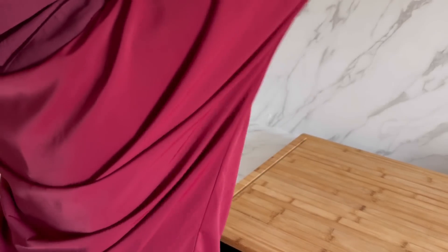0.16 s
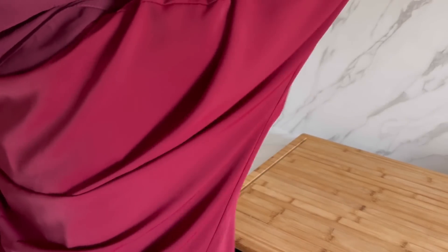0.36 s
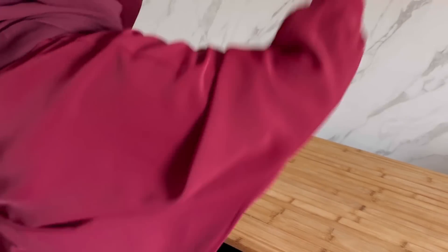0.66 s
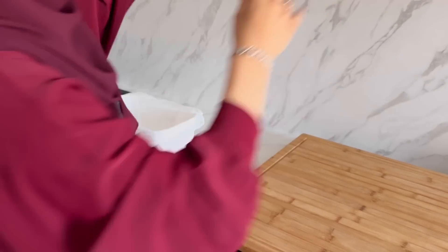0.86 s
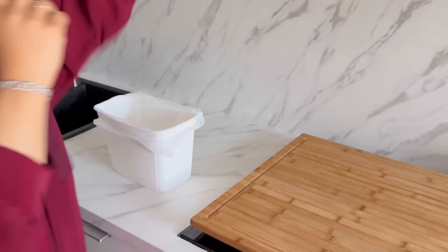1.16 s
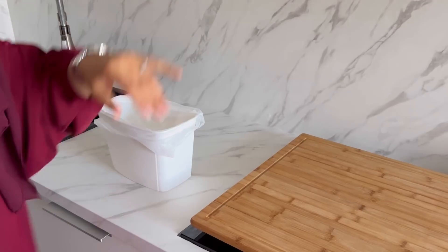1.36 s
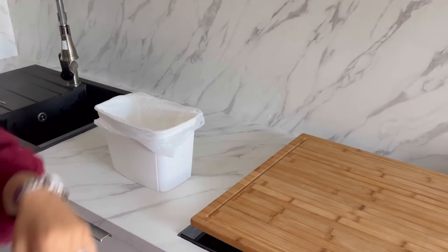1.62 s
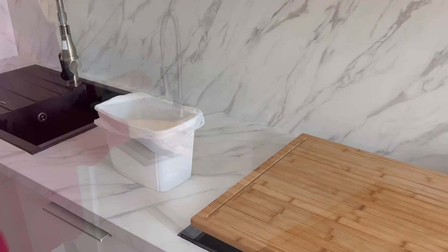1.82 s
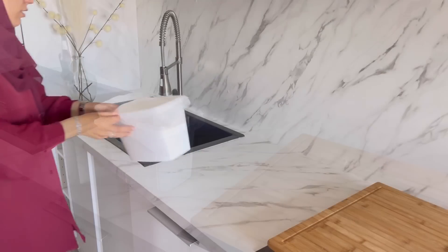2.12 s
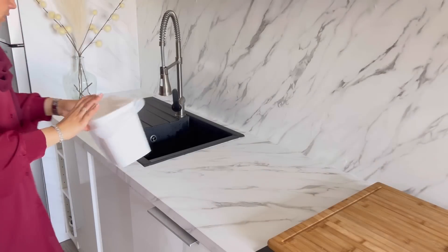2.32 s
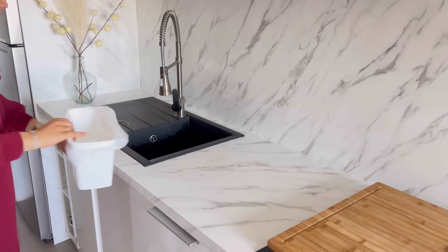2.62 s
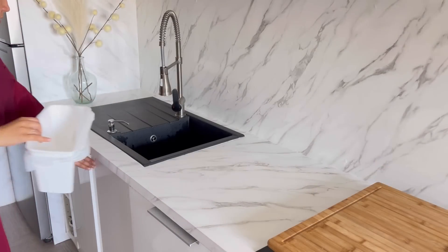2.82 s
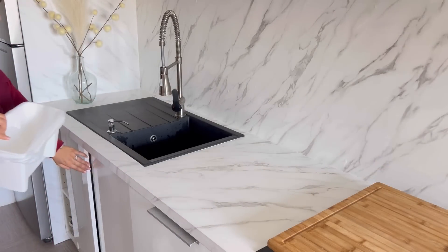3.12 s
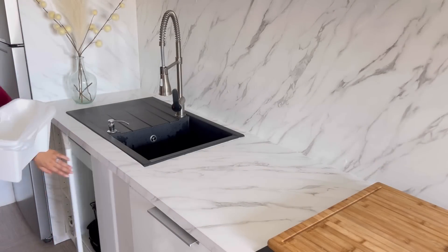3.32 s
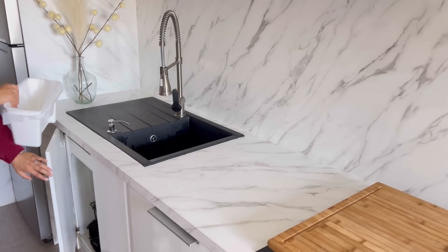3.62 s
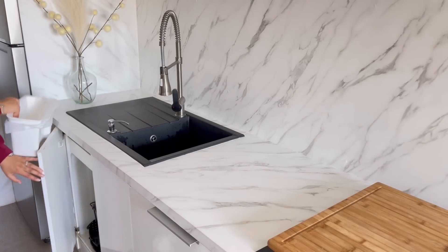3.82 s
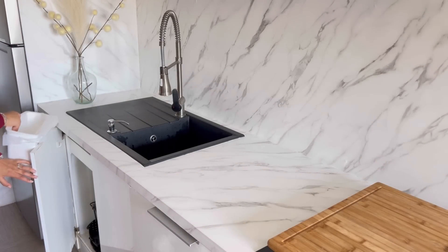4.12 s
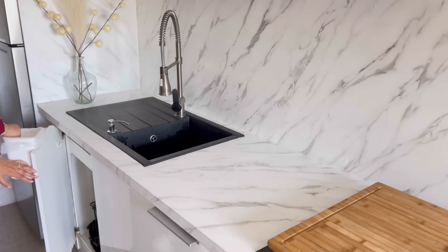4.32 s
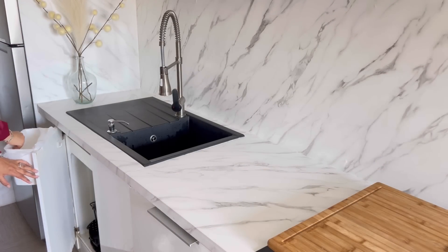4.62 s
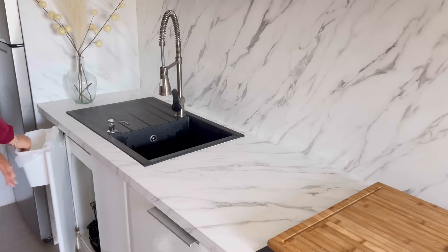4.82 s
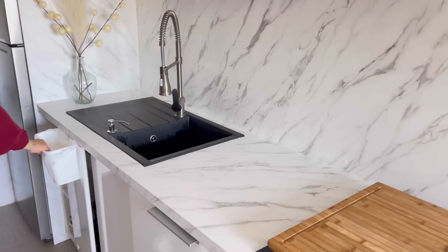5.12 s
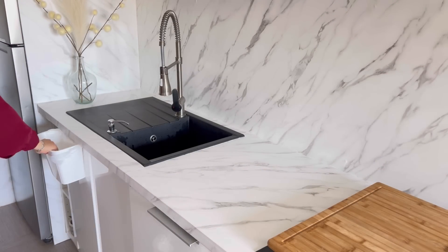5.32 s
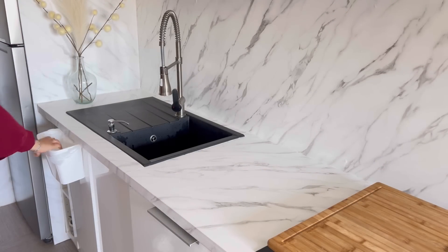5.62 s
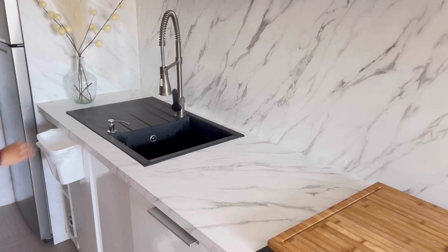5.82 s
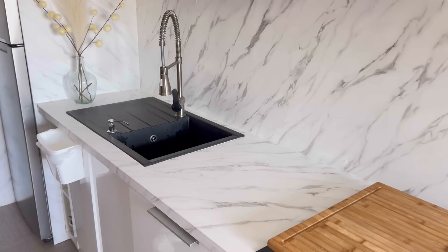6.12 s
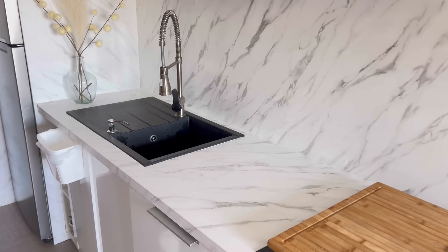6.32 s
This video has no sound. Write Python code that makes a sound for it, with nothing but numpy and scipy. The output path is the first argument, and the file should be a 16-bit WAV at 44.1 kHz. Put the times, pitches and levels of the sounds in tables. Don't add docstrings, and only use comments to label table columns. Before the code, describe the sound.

In a hard kitchen, a hollow door thumps and slams, cloth rustles, and a light plastic bin knocks against a lower cupboard door.

```python
import sys
import numpy as np
from scipy import signal
from scipy.fft import rfft, irfft
from scipy.io import wavfile
from scipy.ndimage import uniform_filter1d

SR = 44100
rng = np.random.default_rng(int(sys.argv[2]) if len(sys.argv) > 2 else 0)


def put_to_file(sound):
    columns = np.atleast_2d(sound).T
    safe = np.clip(columns, -1, 1)
    whole_steps = np.round(safe * 32767)
    wavfile.write(sys.argv[1], SR, whole_steps.astype(np.int16))


def attenuation_scalar(level_db):
    decades = np.asarray(level_db, float) / 20
    return 10 ** decades


N = 284930


def peak_one(x):
    return x / np.abs(x).max()


def rms_one(x):
    return x / np.sqrt(np.mean(x ** 2) + 1e-20)


def band_pass(x, order, edges_hz):
    return signal.sosfilt(signal.butter(order, edges_hz, "band", fs=SR, output="sos"), x)


def high_pass(x, order, hz):
    return signal.sosfilt(signal.butter(order, hz, "high", fs=SR, output="sos"), x)


def at_hz(points, hz):
    point_hz, value = np.transpose(points)
    return np.interp(np.log(hz), np.log(point_hz), value)


def ring(clicks, hz, t60):
    r = attenuation_scalar(-60 / (t60 * SR))
    w = 2 * np.pi * hz / SR
    return signal.lfilter([0, np.sin(w)], [1, -2 * r * np.cos(w), r * r], clicks + 1e-18)


def swell(t, rise, t60):
    fall = attenuation_scalar(-60 * np.clip(t - rise, 0, None) / max(t60, .02))
    return np.clip(t / max(rise, .001), 0, 1) * fall


RAP_BAND = [800, 3300]
TICK_BAND = [3300, 10000]


def knocks(hits, modes, modes_db, hollow_db, cycles, damping, width, brief, contact_s, rise_s):
    out = np.zeros(N)
    t = np.arange(SR // 4) / SR
    click = 1. * (t == 0)
    rings = np.array([attenuation_scalar(db) * ring(click, hz, np.clip(damping * t60, .02, .3)) for hz, db, t60 in modes])
    mode_hz = np.array(modes)[:, 0]
    rise = 1 - np.exp(-t / rise_s)
    sharp_fade = np.exp(-t / (brief * contact_s)) * rise ** .5 + .4 * np.exp(-t / .001)
    for s, peak_db, tone_hz, rap_db, tick_db in hits:
        white = rng.standard_normal(len(t))
        contact = white * rise * np.exp(-t / contact_s)
        sharp = white * sharp_fade
        toned = peak_one(band_pass(contact, 2, [tone_hz / width, tone_hz * width]))
        hollow = peak_one(ring(toned, tone_hz, cycles / tone_hz))
        near = attenuation_scalar(-15 * np.log2(mode_hz / tone_hz) ** 2)
        panel = peak_one(rise * (near @ rings))
        sound = attenuation_scalar(peak_db - 11.0) * (toned + attenuation_scalar(hollow_db) * hollow + attenuation_scalar(modes_db) * panel)
        sound += attenuation_scalar(rap_db - 10.5) * peak_one(band_pass(sharp, 3, RAP_BAND))
        sound += attenuation_scalar(tick_db - 13.5) * peak_one(band_pass(sharp, 3, TICK_BAND))
        at = round(s * SR)
        out[at:at + len(t)] += sound[:N - at]
    return out


# start in seconds, peak in dB, tone in Hz, rap in dB, tick in dB.
DOOR_HITS = [(0.024, -4, 764, -47.5, -40.5), (0.027, -5.5, 300, -57.5, -55),
             (0.048, -15.5, 490, -43.5, -42.5), (0.139, -12, 247, -24.5, -43), (0.243, -36, 280, -22, -39),
             (0.359, -31, 197.4, -31, -27.5), (0.432, -30, 857, -19.5, -46), (0.557, -54, 226, -25, -48),
             (0.721, -29, 316, -23.5, -58), (0.84, -2, 275, -10.5, -18.5), (0.849, -2.5, 248, -16, -39),
             (0.869, -18, 490, -33, -77)]
# frequency in Hz, level in dB, t60 in seconds.
DOOR_MODES = [(118, -19, 0.21), (272, -1.5, 0.39), (275, -14.5, 0.16), (342, 3.5, 0.28), (510.3, 2.5, 0.63),
              (530, -20, 0.28), (820, -11.5, 0.2)]


def door_blows():
    return knocks(DOOR_HITS, DOOR_MODES, modes_db=2.5, hollow_db=-7.5, cycles=34.0, damping=0.11,
                  width=1.39, brief=4.6, contact_s=0.0039, rise_s=0.0016)


# start in seconds, peak in dB, tone in Hz, rap in dB, tick in dB.
BIN_HITS = [(2.081, -31.5, 382, -56, -58), (2.423, -17.5, 401, -34, -23.5), (3.829, -32, 500, -55, -70),
            (3.886, -24, 275, -35, -49), (4.069, -19.5, 292, -52, -30), (4.192, -6.5, 496, -44, -38),
            (4.224, -16, 493, -46, -31), (4.243, -19, 414, -45, -38), (4.292, -31, 425, -49, -56),
            (4.338, -8, 275, -16.5, -13), (4.36, -5, 514, -29, -36), (4.39, -31, 239, -39, -51.5),
            (4.404, -17.5, 270, -16, -13.5), (4.459, -19.5, 695, -47, -60), (4.716, -13.5, 578, -29.5, -32),
            (4.72, -12, 516, -48, -54), (5.201, -14.5, 422, -21, -42), (5.21, -19, 410, -31, -42),
            (5.222, -11.5, 314, -21, -24), (5.244, -16, 247, -38, -49), (5.354, -21, 395, -42, -46)]
# frequency in Hz, level in dB, t60 in seconds.
BIN_MODES = [(118, -8.5, 0.14), (275, 5.5, 0.84), (360.5, 9, 0.4), (463.5, 8, 0.4), (522, 16, 0.11),
             (716, 10.5, 0.2), (850, -17, 0.91), (950, -16, 0.41)]


def bin_blows():
    return knocks(BIN_HITS, BIN_MODES, modes_db=-1.0, hollow_db=-1.0, cycles=17.0, damping=0.2,
                  width=1.61, brief=1.24, contact_s=0.012, rise_s=0.0032)


# start in seconds, peak in dB, tone in Hz, rap in dB, tick in dB.
TAPS = [(1.656, -37.5, 820, -71, -75), (1.712, -47, 1950, -46, -50), (1.784, -55, 1170, -35, -70),
        (2.175, -31, 1170, -47, -55), (2.238, -32.5, 466, -29.5, -52), (2.298, -38.5, 1000, -74, -59),
        (2.659, -39, 1850, -45, -56), (2.784, -35.5, 1150, -35, -48), (2.982, -41, 716, -41, -61),
        (3.496, -75, 1190, -58, -35), (3.878, -40, 1460, -44, -29), (3.936, -36, 940, -42, -55),
        (4.068, -19.5, 660, -52, -21), (4.192, -18, 1065, -47, -47), (4.848, -20, 585, -42, -57)]


def taps():
    return knocks(TAPS, BIN_MODES, modes_db=-5.0, hollow_db=0.5, cycles=5.8, damping=0.1,
                  width=1.33, brief=1.0, contact_s=0.0068, rise_s=0.00066)


# start in seconds, peak in dB, tone in Hz, rap in dB, tick in dB.
NUDGES = [(.372, -32, 480, -20.5, -45), (.705, -32, 320, -36, -70), (.875, -19, 504, -30, -24),
          (2.11, -42, 400, -57, -60), (2.358, -54, 900, -36, -55), (4.258, -24.5, 300, -39, -43),
          (4.425, -20, 705, -33, -34), (4.485, -29, 850, -25, -42), (4.564, -36, 409, -42, -55),
          (4.877, -33, 404, -50, -60), (5.232, -11.5, 1000, -15.5, -40), (5.582, -44, 530, -61, -67),
          (5.699, -35, 525, -58, -72), (5.74, -39, 450, -63, -71)]


def nudges():
    return knocks(NUDGES, BIN_MODES, modes_db=-6.0, hollow_db=-1.5, cycles=5.3, damping=0.08,
                  width=1.84, brief=0.35, contact_s=0.004, rise_s=0.0018)


# start in seconds, peak in dB, tone in Hz, rap in dB, tick in dB.
CRACKS = [(.026, -16.5, 940, -34, -46), (.433, -24, 850, -25, -37), (.446, -23, 1150, -38, -49),
          (.46, -36, 850, -31, -55), (3.879, -30, 1450, -31, -36), (3.937, -32, 1100, -38, -57),
          (4.066, -21.5, 1100, -32, -32), (4.189, -19, 850, -32, -43), (4.196, -18, 1330, -26, -45),
          (4.338, -15, 990, -31, -29), (4.415, -15.5, 1940, -32, -28), (4.716, -28, 1000, -36, -32),
          (5.2, -14, 1440, -25, -45), (2.175, -39, 795, -45, -55), (4.72, -16, 695, -32, -50),
          (4.848, -28, 600, -48, -55), (5.699, -42, 650, -58, -64), (4.199, -18, 600, -35, -50)]


def cracks():
    return knocks(CRACKS, BIN_MODES, modes_db=-19.0, hollow_db=-8.5, cycles=9.9, damping=0.06,
                  width=1.19, brief=0.33, contact_s=0.0038, rise_s=0.00071)


# start in seconds, peak in dB, frequency in Hz, t60 in seconds.
THUDS = [(0.03, -7.5, 107, 0.1), (0.128, -16.5, 155.3, 0.18), (0.358, -24, 156, 0.23),
         (0.845, 3, 121.8, 0.04), (0.874, -37, 105, 0.11), (2.42, -25.5, 193.6, 0.12),
         (2.827, -20.5, 54, 0.13), (3.89, -25.5, 130, 0.059), (4.072, -27, 118, 0.16),
         (4.204, -20.5, 118, 0.23), (4.351, -23, 187, 0.053), (4.729, -30, 121.5, 0.26),
         (5.36, -10.5, 61.4, 0.061)]
# start in seconds, peak in dB, frequency in Hz, t60 in seconds.
BOOMS = [
    (0.855, -12.5, 64, 0.22),
    (5.237, -17.5, 61, 0.2),
]


def thuds():
    out = np.zeros(N)
    t = np.arange(SR // 2) / SR
    for s, peak_db, hz, t60 in THUDS + BOOMS:
        build = 1 - np.exp(-t * hz * 3.6)
        swing = attenuation_scalar(peak_db - 4.5 - 60 * t / t60) * build * np.sin(2 * np.pi * hz * t)
        at = round(s * SR)
        out[at:at + len(t)] += swing[:N - at]
    return out


# start in seconds, frequency in Hz, peak in dB, t60 in seconds, held time in seconds.
PINGS = [(.028, 395, -14.5, 0.18, 0.025), (.038, 504, -14.5, 0.33, 0.037), (.105, 190, -25, 0.31, 0.05),
         (0.268, 177.2, -35.5, 1.0, 0.06), (0.331, 480.6, -35, 0.54, 0.052), (.436, 850, -39, 0.2, 0.03),
         (.846, 138.7, -9.5, 0.21, 0.083), (.843, 254, -13, 0.25, 0.06), (.841, 348, -16.5, 0.2, 0.05),
         (.87, 498, -20.5, 0.24, 0.048), (4.195, 844, -34.5, 0.3, 0.075), (4.2, 504, -22, 0.43, 0.056),
         (4.342, 263.6, -22, 0.93, 0.083), (4.358, 509, -20.5, 0.36, 0.039), (4.4, 757.4, -25, 0.42, 0.11),
         (4.73, 718, -39, 0.52, 0.097), (4.734, 229, -34, 0.37, 0.061), (4.765, 455, -25, .9, .058),
         (4.848, 570, -25, 0.09, .02), (5.215, 641, -26.5, 0.27, 0.062), (5.3, 1730, -45.5, .8, .055),
         (5.365, 193.5, -32, 0.28, 0.062), (.85, 66.5, -10.5, .5, .2), (0.861, 109, -15, 0.3, 0.16),
         (.45, 943, -46, .3, .03), (.434, 1163, -45, .3, .07), (0.48, 1845, -50, .2, .04),
             (.436, 1506, -51, .2, .05), (.47, 850, -44, .5, .09), (.841, 890, -25, .15, .03),
             (.841, 1835, -34, 0.19, .03), (.85, 1100, -30, .2, .03), (.848, 1500, -28, .2, .04),
             (.848, 2380, -34, .2, .04), (.865, 1036, -32, .16, .05), (.85, 3000, -41, .29, .05),
             (.87, 1860, -44, .37, .06), (.87, 2770, -47, .38, .06), (4.19, 1430, -29.5, 0.061, .03),
             (4.191, 2200, -43, .07, .03), (4.195, 2120, -46, .5, .07), (4.2, 1190, -42, .33, .06),
             (4.195, 720, -36, .4, .04), (4.222, 277, -25, .3, 0.041), (4.36, 800, -28, .12, .03),
             (5.222, 1300, -34, .19, .05), (5.222, 1965, -35, 0.17, .03), (5.232, 1041, -33, 0.13, 0.036),
             (5.23, 3008, -46, .26, .07), (5.23, 3458, -46, .34, .07), (5.22, 4300, -43, 0.28, .05),
             (5.26, 1311, -46, .4, .06), (4.718, 1210, -38, .25, .06), (4.718, 2350, -46, .3, .07),
             (4.81, 1200, -46, .4, .03), (4.718, 590, -22, .12, .02), (5.245, 5410, -49, .3, .07),
             (.026, 748, -26, .2, .04), (.028, 1190, -36, .15, .04), (4.853, 410, -35, .5, .04)]


def pings():
    rise_s, stop_s = 0.0029, 0.0061
    out = np.zeros(N)
    t = np.arange(SR // 4) / SR
    for s, hz, db, t60, held in PINGS:
        stop = np.exp(-np.clip(t - held, 0, None) / stop_s)
        at = round(s * SR)
        out[at:at + len(t)] += attenuation_scalar(db) * swell(t, rise_s, t60) * stop * np.sin(2 * np.pi * hz * t)
    return out


def rough_notes(rows, white):
    out = np.zeros(N + 2 * SR)
    warm_up = SR // 2
    for s, hz, db, rise, t60, width in rows:
        life = 2.2 / width
        at = round(s * SR)
        size = round(min(rise + t60, 2) * SR)
        note = white[at:at + size + warm_up]
        for share in (1, 1 / 2, 1 / 4):
            note = ring(note, hz, life * share)
        envelope = swell(np.arange(size) / SR, rise, t60)
        out[at:at + size] += attenuation_scalar(db) * envelope * rms_one(note[warm_up:])
    return out[:N]


# start in seconds, frequency in Hz, level in dB, rise in seconds, t60 in seconds.
HINGE_SLIPS = [
    (0.535, 10500, -53, .03, 0.07),
    (0.608, 10210, -34, .012, 0.5),
    (.665, 10230, -40, 0.02, 0.15),
    (0.687, 8790, -42, .003, 0.28),
    (0.704, 9770, -35, .002, 0.07),
    (.722, 9720, -46, .008, .2),
    (.852, 13380, -47, .01, 0.1),
    (.855, 15150, -68, .005, 0.1),
]


def hinge(friction):
    width_hz = 130
    return rough_notes([(*slip, width_hz) for slip in HINGE_SLIPS], friction)


# start in
# seconds, frequency in Hz, level in dB, t60 in seconds, width in Hz.
RINGS = [(0.025, 499, -26, 0.31, 84), (0.176, 2540, -50.5, 0.37, 430), (0.432, 850, -40, 0.12, 90),
         (.845, 2600, -44, 0.45, 1500), (0.85, 485, -57, 2.65, 23), (1.399, 4600, -80, 0.59, 900),
         (1.717, 5700, -66, 0.14, 700), (1.788, 2200, -62, .2, 600), (1.784, 1170, -63.5, 0.14, 140),
         (1.9, 4700, -59.5, 0.37, 1700), (4.2, 570, -50, 0.28, 34), (4.362, 253, -33.5, 0.26, 45),
         (2.66, 1900, -58, 1.24, 2100), (4.724, 438, -26, 0.088, 59.6), (4.75, 690, -43, 0.28, 41),
         (5.225, 5420, -51.5, 0.36, 200), (2.785, 1200, -56, 0.27, 250), (5.578, 553, -51.5, 0.18, 360),
         (5.696, 510, -51, 0.13, 300), (5.225, 3500, -47, 0.27, 1300), (6.27, 1460, -71, 0.29, 720),
         (.24, 3730, -57, .2, 300), (.26, 4350, -56.5, .25, 400), (.15, 1500, -49.5, .15, 250),
         (1.3, 260, -59, 2, 350), (1.655, 1150, -62, .3, 500), (0.45, 1920, -54.5, 0.34, 650),
         (2.235, 2050, -60, .25, 500), (5.82, 1150, -73, 1.9, 600)]


def left_ringing(friction):
    rise_s = 0.0094
    return rough_notes([(s, hz, db, rise_s, t60, width) for s, hz, db, t60, width in RINGS], friction)


EDGES = 40 * 2 ** np.arange(0, 8.9, .5)
CENTRES = np.sqrt(EDGES[1:] * EDGES[:-1])
# frequency in Hz, left-right likeness from 0 to 1.
LIKENESS = [(60, .975), (160, 0.9), (270, 0.62), (450, 0.3), (750, 0.03), (2000, 0.03), (8000, 0.6)]


def bands(size):
    white = rng.standard_normal((2, 2, size))
    out = []
    for k, hz in enumerate(CENTRES):
        mid, side = band_pass(white[k % 2], 2, EDGES[k:k + 2])
        alike = at_hz(LIKENESS, hz)
        out.append(np.sqrt(1 + alike) * mid + np.sqrt(1 - alike) * side * [[1], [-1]])
    return out


def drift(rate):
    r = np.exp(-80 * np.pi * rate / SR)
    slow = signal.lfilter([1], [1, -2 * r, r * r], rng.standard_normal(N // 40 + 2002))[2000:]
    return np.interp(np.arange(N) / 40, np.arange(len(slow)), rms_one(slow))


def shaped(noise, spectrum, patchy_db):
    together = drift(6.8)
    out = 0
    for hz, band in zip(CENTRES, noise):
        if spectrum[0][0] < hz < spectrum[-1][0]:
            flicker = patchy_db * (together + 0.26 * drift(16.0))
            out = out + attenuation_scalar(at_hz(spectrum, hz) + flicker) * band
    return rms_one(out)


# start in seconds, swell in seconds, hold in seconds, swish in dB, sheen in dB.
REACHES = [(0.0, 0.037, 0.22, -49, -60.5), (0.09, 0.15, .04, -50.5, -62), (0.318, 0.037, 0.045, -53, -65),
           (0.434, 0.003, .02, -51.5, -80), (0.536, 0.021, 0.42, -60.5, -115),
           (0.715, .004, 0.022, -49.5, -115), (0.839, 0.003, 0.011, -46.5, -89),
           (1.052, 0.11, 0.038, -61, -78), (1.69, 0.033, 0.069, -60, -85),
           (1.889, 0.038, 0.011, -51.5, -75), (.9, .03, 0.15, -65.5, -84.5),
           (1.286, 0.063, 0.44, -76, -89.5)]
# start in seconds, swell in seconds, hold in seconds, swish in dB, sheen in dB.
GRIPS = [(2.067, 0.044, 0.14, -53, -60.5), (2.215, 0.065, 0.37, -57.5, -71),
         (2.413, .008, 0.0067, -42.5, -47.5), (2.658, 0.02, 0.055, -55, -79),
         (2.785, 0.0064, 0.014, -53.5, -86.5), (2.907, 0.061, 0.23, -75.5, -96),
         (3.168, 0.04, 0.094, -64.5, -85.5), (3.307, 0.069, 0.033, -59, -68.5),
         (3.443, 0.058, 0.047, -61.5, -66), (3.526, 0.14, 0.096, -58, -64.5),
         (3.863, .005, 0.32, -65, -85.5), (4.058, 0.008, 0.14, -52.5, -64),
         (4.289, 0.072, 0.058, -41.5, -53.5), (4.384, 0.0086, 0.026, -40.5, -68),
         (4.55, 0.044, .18, -62.5, -76), (4.74, 0.22, 0.085, -53.5, -63), (5.05, 0.064, 0.06, -52, -58.5),
         (5.208, 0.019, 0.017, -43.5, -62.5), (5.393, 0.17, 0.077, -56.5, -64.5),
         (5.76, 0.11, 0.039, -67.5, -93), (6.125, 0.15, 0.046, -69, -93)]


def strokes(levels_db, fade_db_per_s):
    swell_from_db = -13.5
    t = np.arange(0, N, 16) / SR
    power = 1e-14
    for (s, rise, hold, *_), db in zip(REACHES + GRIPS, levels_db):
        rising = swell_from_db * np.clip(1 - (t - s) / rise, 0, 1) ** 2
        fading = fade_db_per_s * np.clip(t - s - rise - hold, 0, None)
        power = power + (t >= s) * attenuation_scalar(db + rising - fading) ** 2
    return np.interp(np.arange(N) / SR, t, np.sqrt(power))


# start in seconds, level in dB, t60 in seconds.
SHUDDERS = [(0.0, -35.5, 2), (.2, -41, 1.4), (0.026, -23.5, 0.29), (0.353, -32, 0.25), (.434, -35, 0.3),
            (.72, -42.5, 1.1), (0.842, -14.5, 0.36), (1.0, -49, 1.6), (2.23, -52, 1.4), (2.788, -46, 0.51),
            (3.502, -55, 0.62), (3.879, -38, 0.3), (4.066, -30, 0.34), (4.198, -25.5, 0.39),
            (4.392, -20, 0.47), (4.717, -29, 0.33), (5.216, -21.5, 0.37)]
# frequency in Hz, level in dB per Hz.
BODY = [(150, -5), (300, 2.5), (700, -5.5), (1500, -10), (3000, -31.5), (5000, -36)]
SWISH = [(1200, -8.5), (2500, -9), (4500, -8), (7000, -4.5), (9000, -15.5), (11000, -30)]
SHEEN = [(6500, -25), (8500, -24.5), (11000, -39.5), (13000, -13.5), (16000, -3)]


def rustle():
    noise = bands(size=N)
    *_, swish_db, sheen_db = np.transpose(REACHES + GRIPS)
    swish = strokes(swish_db, fade_db_per_s=120.5)
    sheen = strokes(sheen_db, fade_db_per_s=159)
    t = np.arange(0, N, 16) / SR
    shaken = sum((attenuation_scalar(db) * swell(t - s, 0.0009, t60)) ** 2 for s, db, t60 in SHUDDERS)
    shaken = np.interp(np.arange(N) / SR, t, shaken)
    body = np.sqrt(shaken + (attenuation_scalar(-8.5) * swish) ** 2) * shaped(noise, BODY, patchy_db=0.0)
    soft = body + swish * shaped(noise, SWISH, patchy_db=.7)
    soft = signal.sosfilt(signal.butter(9, 10000, fs=SR, output="sos"), soft)
    fine = shaped(noise, SHEEN, patchy_db=3.0)
    fine = fine + attenuation_scalar(3.5) * high_pass(fine, 2, 14500)
    return soft + attenuation_scalar(10.0) * sheen * fine


# frequency in Hz, t60 in seconds.
KITCHEN_T60 = [(60, 0.36), (120, 0.57), (300, 0.3), (700, 0.49), (2000, 0.65), (5000, 0.16), (12000, 0.073)]
# frequency in Hz, tail over direct sound in dB.
WET = [(60, -2), (150, 2.5), (400, -1), (1000, 1), (3000, -0.5), (8000, -5.5), (16000, 3)]


def kitchen():
    t = np.arange(SR * 3 // 4) / SR
    tail = sum(band * attenuation_scalar(-60 * t / at_hz(KITCHEN_T60, hz)) for hz, band in zip(CENTRES, bands(size=len(t))))
    lines = rfft(tail * np.clip((t - .006) / .006, 0, 1), axis=1)
    lines = lines / np.sqrt(uniform_filter1d(np.abs(lines) ** 2, size=45, axis=1) + 1e-12)
    tail = irfft(lines * attenuation_scalar(at_hz(WET, np.fft.rfftfreq(len(t), 1 / SR) + 1)), len(t), axis=1)
    return tail * np.clip(t / .004, 0, 1) * (t < .7)


# time in seconds, level in dB.
RUMBLE = [(0.0, -31), (0.29, -42.5), (0.79, -37.5), (1.0, -46), (1.22, -39.5), (1.65, -44.5), (3.2, -51.5),
          (3.96, -49.5), (4.32, -44), (4.71, -50.5), (5.3, -48.5), (5.42, -48), (5.55, -50), (5.85, -44),
          (6.46, -54)]
# frequency in Hz, width in Hz, level in dB.
HUM = [(48, 8.9, -34.5), (61.9, 77, 5.5), (90.04, 4.3, 0), (190, 30, -10.5)]


def rumble():
    s, db = np.transpose(RUMBLE)
    level_db = np.interp(np.arange(N) / SR, s, db)
    hum = sum(attenuation_scalar(db) * rms_one(ring(rng.standard_normal(N), hz, 12.6 / width)) for hz, width, db in HUM)
    return attenuation_scalar(level_db) * rms_one(hum)


# frequency in Hz, level in dB per Hz.
FLOOR = [(60, -3.5), (200, -13), (700, -22), (2100, -33.5), (3000, -57), (9000, -50.5), (11700, -103),
         (19800, -120)]


def quiet_air():
    return attenuation_scalar(-54) * shaped(bands(size=N), FLOOR, patchy_db=2.0)


def scene():
    struck = door_blows() + bin_blows() + taps() + thuds()
    cloth = rustle()
    air = quiet_air()
    friction = rng.standard_normal(N + 3 * SR)
    notes = hinge(friction) + left_ringing(friction)
    tail, low, clean = kitchen(), rumble(), pings()
    struck += attenuation_scalar(2.0) * notes + nudges() + cracks()
    to_room = struck + attenuation_scalar(-10.0) * clean
    wet = signal.fftconvolve(tail, to_room[None], axes=1)[:, :N]
    return struck + wet + clean + notes + cloth + air + low


def top_cut(x):
    return signal.sosfilt(signal.butter(12, 15920, fs=SR, output="sos"), x)


# frequency in Hz, left minus right in dB.
LEFT_LEAD = [(60, 0), (300, .7), (1300, 1.3), (2400, 2.5), (4400, 6.5), (6500, 7), (8600, 0), (16000, 0)]


def record(dry):
    hz = np.fft.rfftfreq(N, 1 / SR)
    left, right = rfft(dry, axis=1)
    single = np.clip((hz - 7000) / 2600, 0, 1)
    turn = np.exp(2j * np.pi * (hz - 8400) / 3560)
    late = np.exp(-2j * np.pi * hz * 1.5 / SR)
    right = np.sqrt(1 - single) * right * late + np.sqrt(single) * left * turn
    tilt = attenuation_scalar(at_hz(LEFT_LEAD, hz + 1) / 2)
    ports = irfft([left * tilt, right / tilt] * (hz < 15850), N, axis=1)
    mix = np.clip(high_pass(ports, 5, 46), -1, 1)
    return top_cut(mix)


dry = scene()
out = record(dry)
put_to_file(out)
```